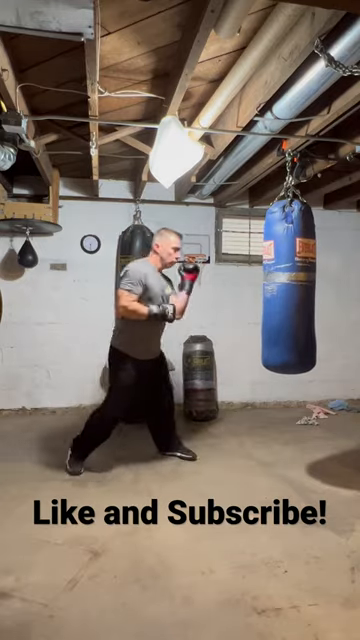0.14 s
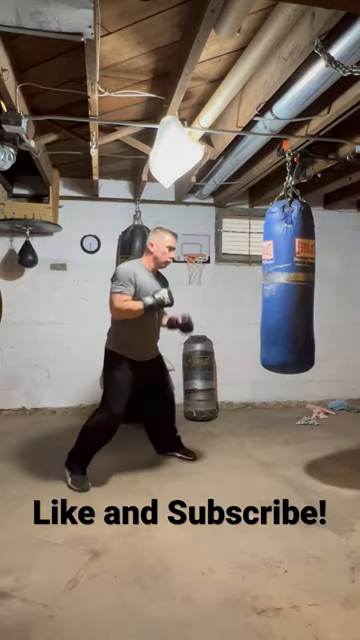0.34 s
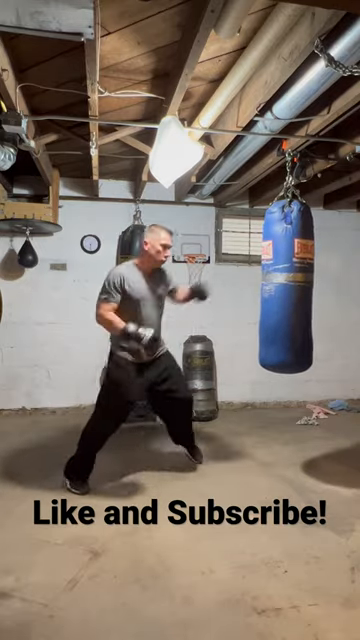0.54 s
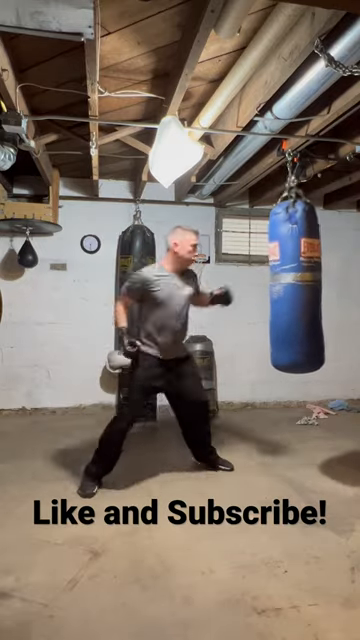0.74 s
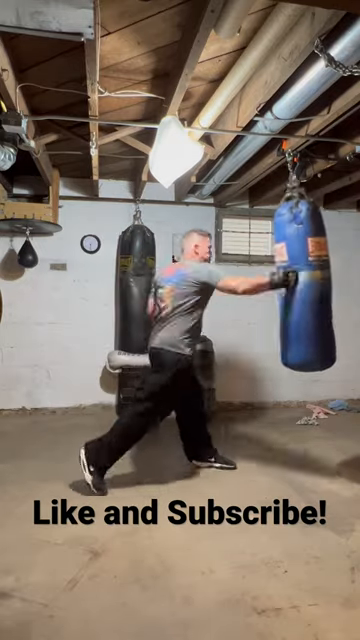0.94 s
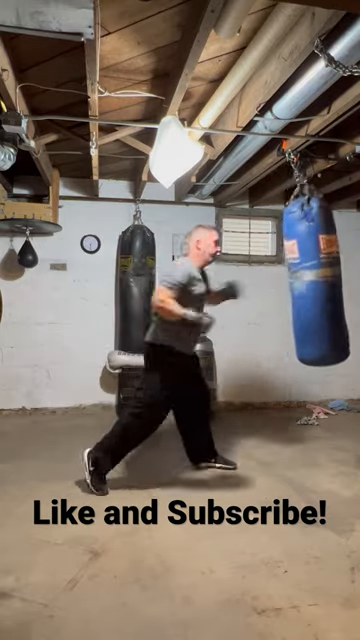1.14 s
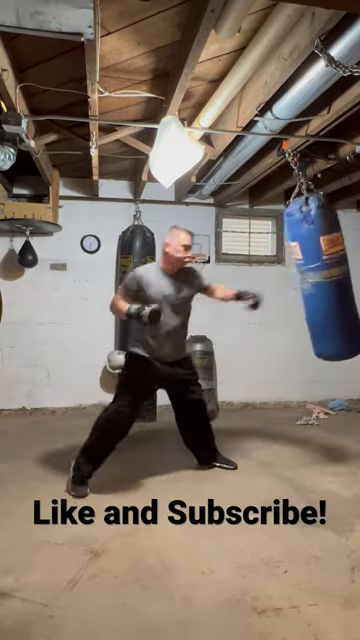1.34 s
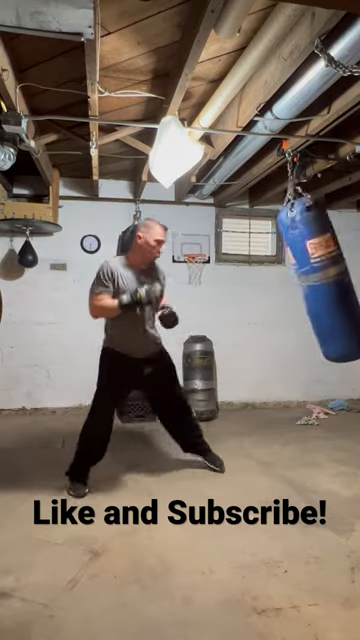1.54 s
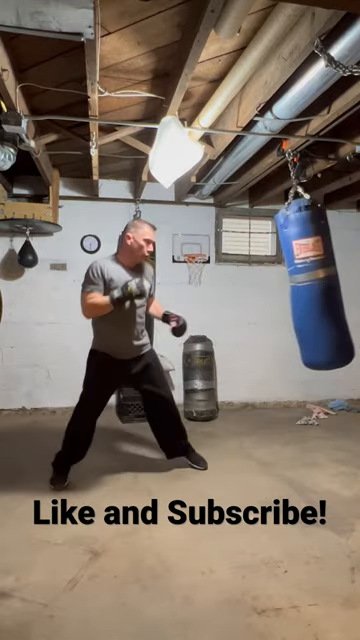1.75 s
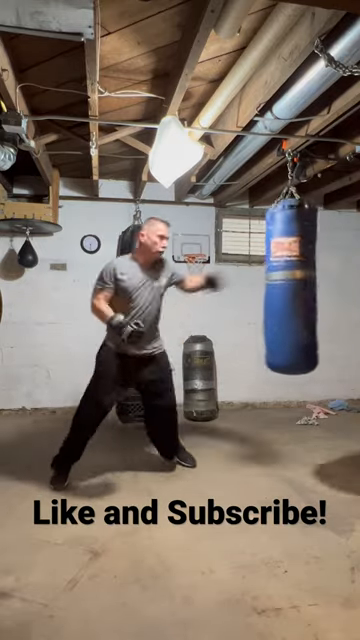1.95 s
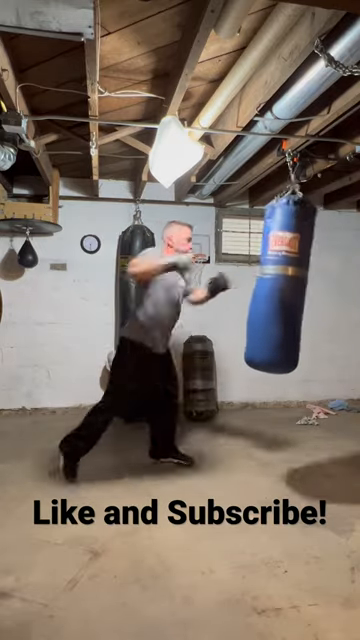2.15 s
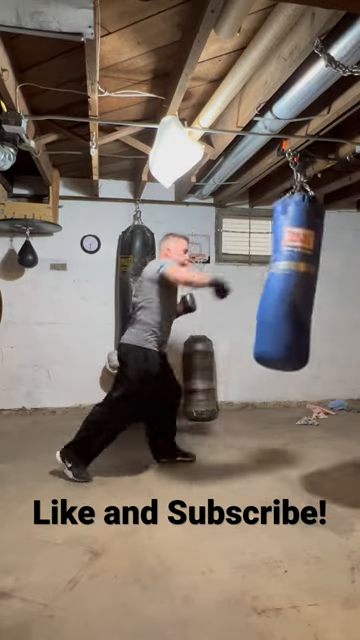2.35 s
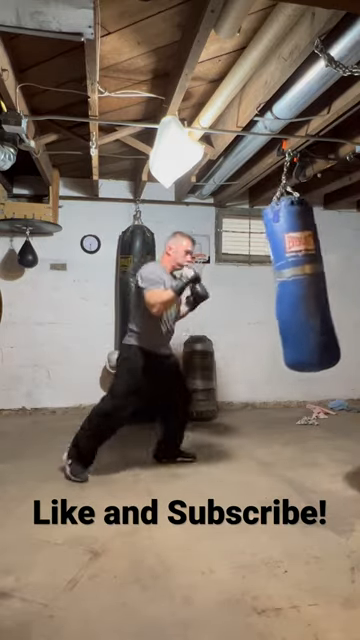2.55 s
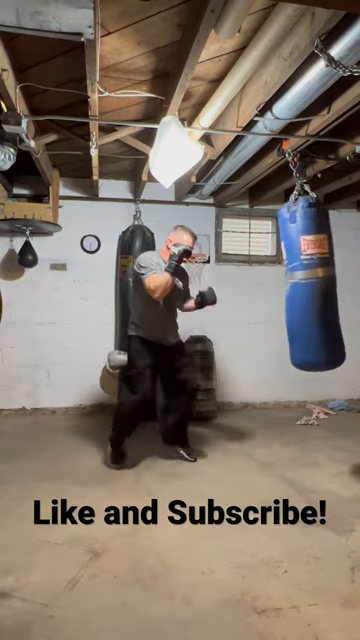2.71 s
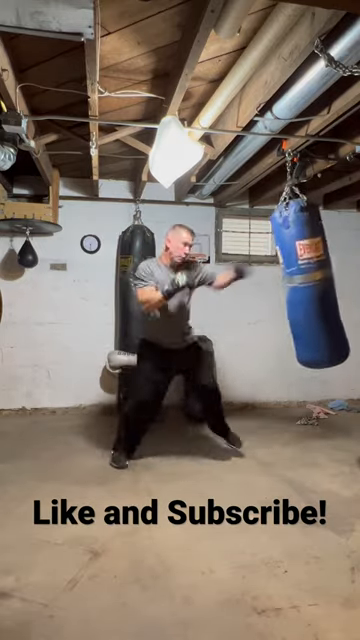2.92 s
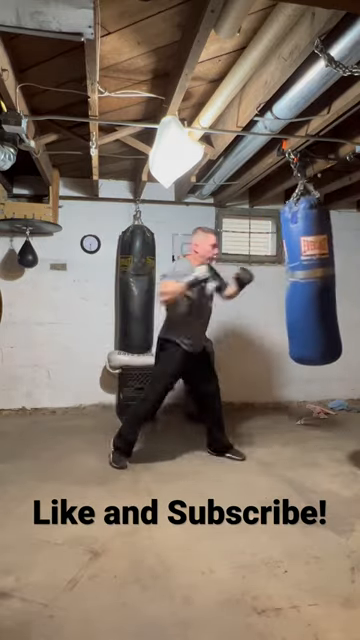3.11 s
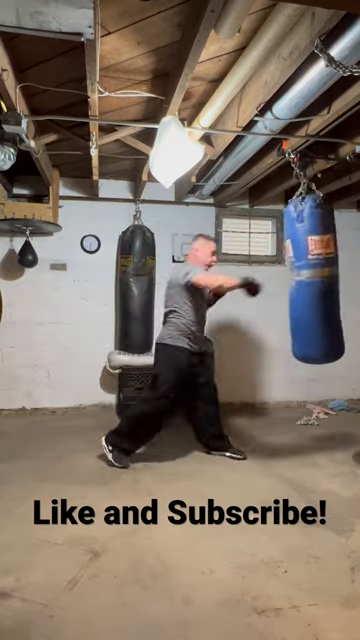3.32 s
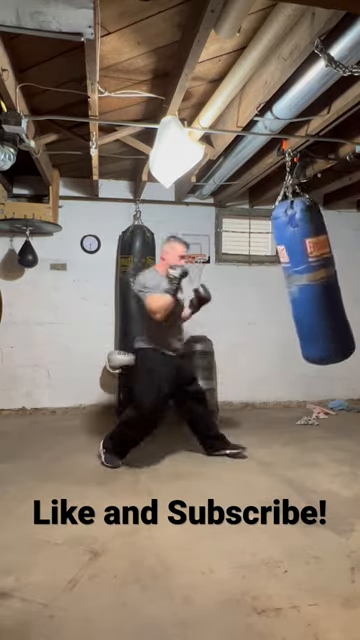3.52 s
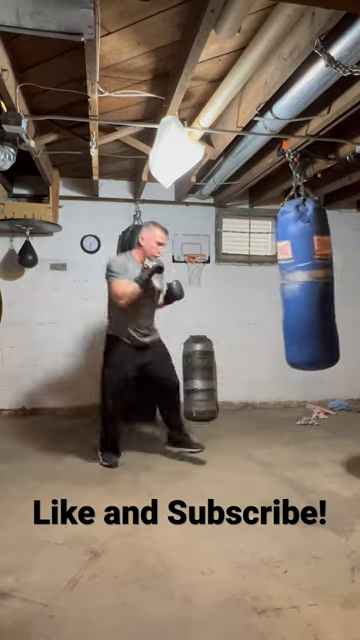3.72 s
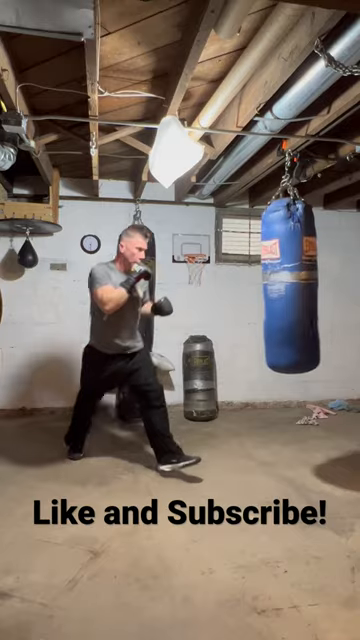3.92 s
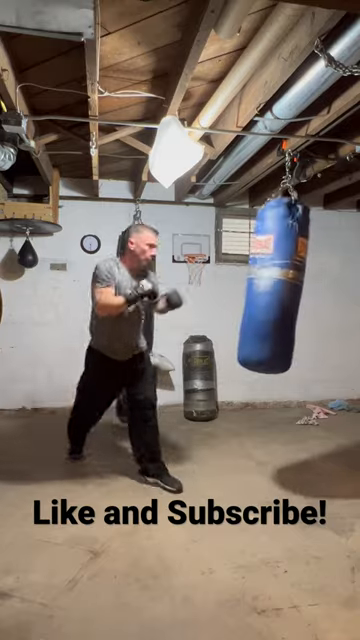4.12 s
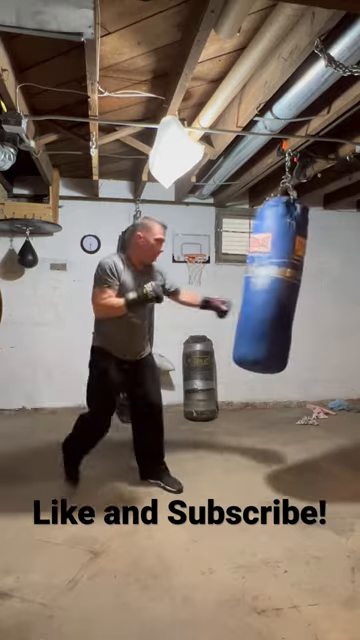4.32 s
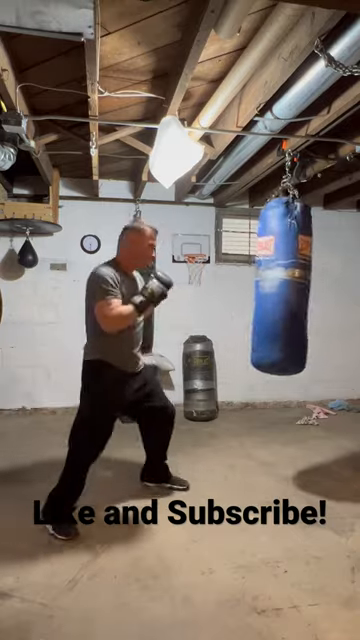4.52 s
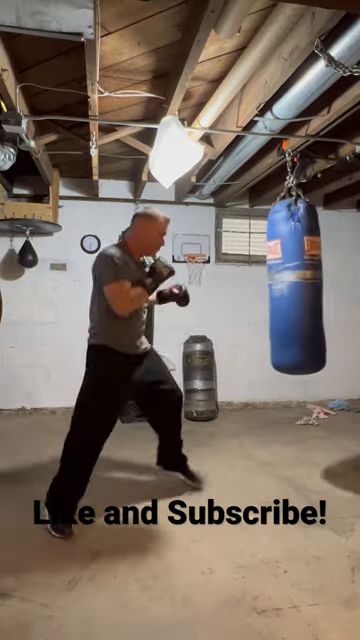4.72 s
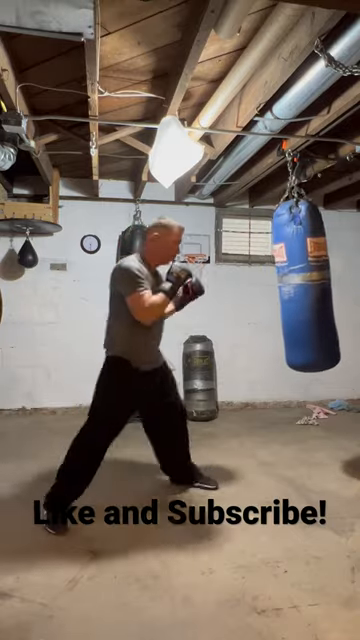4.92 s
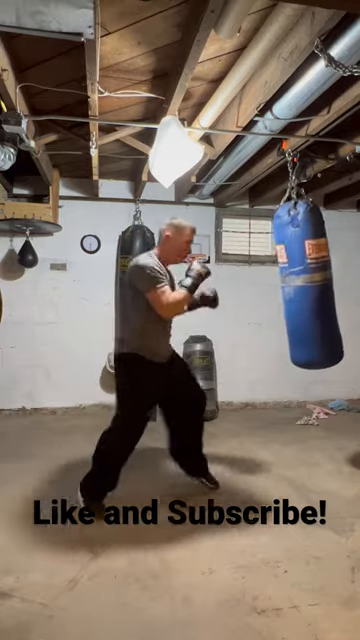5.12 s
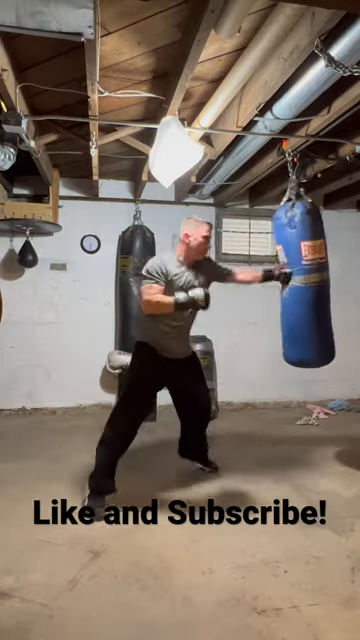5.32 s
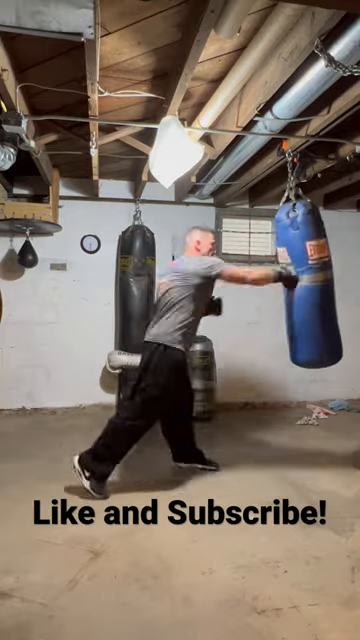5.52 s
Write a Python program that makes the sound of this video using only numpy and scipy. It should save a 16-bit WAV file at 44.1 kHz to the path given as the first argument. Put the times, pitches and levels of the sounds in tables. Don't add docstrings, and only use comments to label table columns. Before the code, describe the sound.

Ten sharp leather-on-bag punches in uneven groups boom through a small concrete basement, with footsteps, rubber squeaks and creaking timber between them.

```python
import sys
import numpy as np
from scipy import signal
from scipy.fft import rfft, irfft, next_fast_len
from scipy.io import wavfile
from scipy.ndimage import uniform_filter1d

SR = 44100
rng = np.random.default_rng(int(sys.argv[2]) if len(sys.argv) > 2 else 0)


def magnitude_from_level(level_db):
    exponent = np.asarray(level_db, float) / 20
    return 10 ** exponent


def waveform_to_disk(signal):
    frames = np.transpose(np.atleast_2d(signal))
    scaled = np.clip(frames, -1, 1) * 32767
    samples = np.round(scaled).astype(np.int16)
    wavfile.write(sys.argv[1], SR, samples)


N = 245195

# start in seconds, level of the thud in dB, of the slap in dB,
# of the joist boom in dB, weight of the thud in dB per octave downward.
BLOWS = [
    (0.57, -16, -20.5, -22.5, -0.5),
    (0.934, -5.5, -11.5, -17.5, 0),
    (1.217, -9.5, -14.5, -19, 1),
    (2.005, -13.5, -21.5, -19, 3.5),
    (2.23, -5, -13, -17, -0.5),
    (2.967, -11, -19.5, -22, 3),
    (3.209, -5.5, -15, -17.5, 1.5),
    (4.211, -14.5, -25.5, -29.5, 3.5),
    (5.302, -5.5, -17.5, -19.5, 0.5),
    (5.51, -6, -14.5, -15, -1),
]
# start in seconds, level in dB, pitch of the knock in Hz, low push in dB.
LANDINGS = [
    (0.343, -48.5, 426, 4),
    (1.158, -19, 204, -7),
    (1.751, -29, 160.6, -19),
    (2.735, -29, 402, 5.5),
    (4.12, -36.5, 188.7, -14),
    (4.447, -38, 188, -17),
    (4.766, -36, 352, -14),
    (4.8254, -29, 261, -31),
    (4.8859, -28.5, 418, -7),
    (5.073, -32, 721, -7),
]
# pitch in Hz, level in dB, time to fall by 60 dB in seconds.
TIMBER = [(31, -13, 0.4), (40.9, -24, 0.52), (54.3, -5.5, 0.68), (58.8, -5.5, 0.98), (68.53, 0.5, 0.53),
          (77.03, -1.5, 0.64), (90.1, 1, 0.25), (157.5, -3, 0.3), (231, -8.5, 0.24), (309, -14.5, 0.45),
          (437, -12.5, 0.27)]


def evened(x):
    return x / np.sqrt(np.mean(x ** 2) + 1e-20)


def read(points, hz):
    f, value = np.transpose(points)
    return np.interp(np.log(hz + 1), np.log(f + 1), value)


def add(mix, s, sound):
    part = mix[..., round(s * SR):][..., :sound.shape[-1]]
    part += sound[..., :part.shape[-1]]


def clock(length_s):
    return np.arange(round(length_s * SR) + 1) / SR


def colour(x, points):
    log_gain = np.log(magnitude_from_level(read(points, abs(np.fft.fftfreq(8192, 1 / SR)))))
    taps = np.fft.ifft(np.exp(np.conj(signal.hilbert(log_gain)))).real[:4096]
    taps = taps.reshape((1,) * (x.ndim - 1) + (-1,))
    return signal.oaconvolve(x, taps, axes=-1)[..., :x.shape[-1]]


def resonate(x, hz, width):
    turn = np.exp(2j * np.pi * np.cumsum(hz * np.ones(len(x))) / SR)
    r = np.exp(-np.pi * width / SR)
    return 2 * (turn * signal.lfilter([1 - r], [1, -r], x / turn)).real


def ring(modes, t, factor, phases):
    total = 0
    for (hz, db, t60), phase in zip(modes, phases):
        total = total + magnitude_from_level(db - 60 * t / t60) * np.sin(2 * np.pi * (hz * factor * t + phase))
    return total


def basement(sound, wet_db):
    # frequency in Hz, time to fall by 60 dB in seconds.
    tail_times = [(60, 0.98), (250, 0.48), (700, 0.51), (2000, 0.38), (5000, 0.44), (10000, 0.34),
                  (16000, 0.84)]
    # delay in seconds, level in dB.
    echoes = [(.0035, -14.5), (0.0143, -7.5), (0.0136, -9.5), (.021, -11.5), (0.028, -27)]
    size = SR // 2
    hz, t, z = signal.stft(rng.standard_normal((2, size)), SR, nperseg=256)
    z = z * magnitude_from_level(-60 * t / read(tail_times, hz)[:, None])
    tail = signal.istft(z, SR, nperseg=256)[1][:, :size]
    tail = tail * np.minimum(np.arange(size) / SR / 0.013, 1)
    taps = magnitude_from_level(wet_db) * tail / np.linalg.norm(tail[0])
    taps[:, 0] += (1, .4)
    for s, db in echoes:
        taps[[0, 1], (s * SR * rng.uniform(.9, 1.1, 2)).astype(int)] += magnitude_from_level(db)
    return signal.fftconvolve(sound[None], taps, axes=1)


def punch(thud_db, slap_db, boom_db, weight_db):
    # pitch in Hz, level in dB, time to fall by 60 dB in seconds.
    filling = [(112.6, 1, 0.032), (170.4, 0.5, 0.077), (231.7, 0, 0.06), (341, -6, 0.035), (423, 5, 0.022),
               (596, -7.5, 0.039), (717, -3, 0.023), (1116, -4, 0.011), (1470, 8, 0.0076),
               (1900, -40, 0.0054)]
    # frequency in Hz, gain in dB.
    leather = [(200, -25), (700, -7), (1500, -4), (3000, 7.5), (7000, -2), (12000, -16.5), (18000, -13)]
    t = clock(.12)
    factor = 1.0545 - 0.0345 * weight_db

    crackle = 0.07 * rng.standard_normal(len(t)) * np.exp(-t / 0.012)
    snap = 0.66 * rng.standard_normal(len(t))
    for level, hz in ((0.37, 3300), (1.16, 1700), (0.73, 7200)):
        snap += level * np.cos(2 * np.pi * hz * t)
    snap = 0.94 * snap * np.exp(-t / 0.00033) * (1 - np.exp(-t / .0001))
    slap = colour(snap + crackle, leather)

    modes = [(hz, db - weight_db * np.log2(hz / 350), t60) for hz, db, t60 in filling]
    phases = np.arange(len(filling)) / 2 + rng.uniform(0, 0.28, len(filling))
    turns = np.cumsum(factor * (140 + 700 * np.exp(-t / 0.005774))) / SR
    dent = 2.08 * np.sin(2 * np.pi * turns) * np.exp(-t / 0.008)
    rags = evened(resonate(rng.standard_normal(len(t)), 630, 820))
    packing = 0.34 * rags * np.exp(-t / 0.011)
    thud = (ring(modes, t, factor, phases) + dent + packing) * (1 - np.exp(-t / 0.00076))
    heard = basement(magnitude_from_level(slap_db + 13.5) * slap + magnitude_from_level(thud_db - 9.5) * thud, 2.12)

    t = clock(1.2)
    timber = [(hz * rng.uniform(1.0, 1.04), db, t60) for hz, db, t60 in TIMBER]
    boom = ring(timber, t, 0.97, rng.random(len(TIMBER)))
    boom = boom * (1 - np.exp(-(t / 0.0097) ** 2))
    out = np.zeros((2, len(t)))
    add(out, 0, heard)
    add(out[0], 0, magnitude_from_level(boom_db + 1.5) * boom)
    return out


def jingle(db, length):
    # pitch in Hz, level in dB, time to fall by 60 dB in seconds.
    steel = [(9810, 0, .03), (10200, -5, .02), (11300, -2, .025), (10800, -7, .015), (12200, -6, .02),
             (11700, -7, .015), (8900, -12, .012)]
    t = clock(length)
    hits = rng.random(len(t)) < 380 / SR
    clashes = hits * rng.standard_normal(len(t)) * np.exp(-1.5 * t / length)
    clashes[0] = 1
    modes = [(hz * rng.uniform(.995, 1.015), level + rng.normal(0, 3), t60) for hz, level, t60 in steel]
    rattle = signal.fftconvolve(clashes, ring(modes, clock(.05), 1, np.zeros(len(steel))))
    return basement(magnitude_from_level(db - 7.5) * rattle / np.std(rattle[:len(t)]), -1.3)


def scuff(db, rise, fall, bright_db, start):
    # frequency in Hz, gain in dB.
    rough = [(150, -17), (500, -7.5), (1100, -0.5), (1600, -2), (3600, 3), (7000, 0.5), (12000, -13.5),
             (18000, -26)]
    t = clock(rise + 5 * fall)
    grit = rng.standard_normal(len(t)) * magnitude_from_level(5.5 * rng.standard_normal(len(t)))
    shape = [(hz, g + bright_db * np.log2(hz / 3000)) for hz, g in rough]
    swell = (start + (1 - start) * t / rise) ** 2
    stroke = np.where(t < rise, swell, np.exp((rise - t) / fall))
    return basement(magnitude_from_level(db - 1.5) * evened(colour(grit, shape)) * stroke, 0.83)


def brush(db):
    return scuff(db, rise=0.0066, fall=.0025, bright_db=-2.5, start=0.74)


def strap(db, fall, bright_db):
    return scuff(db, rise=0.035, fall=fall, bright_db=bright_db, start=0.88)


def step(db, hz, low_db):
    t = clock(0.15)
    turns = np.cumsum(hz + 1800 * np.exp(-t / 0.001066)) / SR
    knock = np.sin(2 * np.pi * turns) * np.exp(-t / 0.0091)
    knock = knock + ring([(hz * 0.546, -2, .05), (75, low_db, .12)], t, 0.86, (0, 0))
    puff = resonate(resonate(rng.standard_normal(len(t)), 350, 410), 350, 410)
    puff = 2.8 * puff * np.exp(-t / 0.026)
    return basement(magnitude_from_level(db - 7.5) * (1.5 * knock + 1.1 * puff), .5)


def slide(db, rise, fall, start):
    return scuff(db, rise, fall, bright_db=-1.3, start=start)


def skid(db, fall):
    return scuff(db, rise=0.0014, fall=fall, bright_db=-1, start=0.53)


def squeak(db, hz, width, length):
    t = clock(length)
    pitch = hz * (1 + 0.0093 * np.sin(np.pi * t / length))
    whistle = resonate(resonate(rng.standard_normal(len(t)), pitch, width), pitch, width)
    shape = signal.windows.tukey(len(t), .12) * magnitude_from_level(-6 * t / length)
    return basement(magnitude_from_level(db + 1.5) * evened(whistle) * shape, -1.32)


def joists():
    timber = ring(TIMBER, clock(.5), 0.98, np.zeros(len(TIMBER)))
    return evened(signal.fftconvolve(rng.standard_normal(N), timber)[:N])


def sway(blows, blow_db, landing_db, build, loss_db, rest_db):
    jolts = [(s, db + blow_db) for s, db in blows] + [(s, db + landing_db) for s, db, *_ in LANDINGS]
    s, db = np.transpose(jolts)
    times = np.arange(0, N / SR + .01, .002)
    t = np.maximum(times[:, None] - s, 0)
    motion = magnitude_from_level(db - loss_db * t) * (1 - np.exp(-(t / build) ** 2))
    power = magnitude_from_level(2 * rest_db) + (motion ** 2).sum(1)
    return np.interp(np.arange(N) / SR, times, np.sqrt(power))


def swaying():
    # start in seconds, level
    # in dB.
    shakes = [
        (.34, -57),
        (.68, -28),
        (1.501, -27),
        (2.76, -24),
        (3.501, -25),
        (5.1, -53),
    ]
    # level against the blow in dB, against the
    # landing in dB, time to build in seconds, loss in dB per second, level at rest in dB.
    groan_motion = (-9, -20, 0.23, 31, -72)
    shiver_motion = (-21.5, -10, 0.41, 45.5, -67.5)
    # frequency in Hz, gain in dB.
    rustle_tone = [(120, -3.5), (300, 2), (700, -2), (1500, -12), (3500, -12.5), (8000, -17.5),
                   (12000, -25), (18000, -53)]
    groan = sway([(s, boom_db) for s, _, _, boom_db, _ in BLOWS] + shakes, *groan_motion)
    shiver = sway([(s, thud_db) for s, thud_db, *_ in BLOWS], *shiver_motion)
    flicker_db = 1.3 * evened(uniform_filter1d(rng.standard_normal(N), 700))
    rustle = evened(colour(rng.standard_normal((2, N)), rustle_tone))
    rustle = rustle * shiver * magnitude_from_level(flicker_db - 2)
    return rustle + [[1], [0]] * groan * joists()


def room_tone():
    # frequency in Hz, gain in dB.
    air = [(18, -33), (30, 3), (199, 1), (449, -7), (600, -15), (1070, 6), (4910, -15), (7670, -8),
           (12000, -22), (13000, -33), (16000, -42)]
    return magnitude_from_level(-69) * evened(colour(rng.standard_normal((2, N)), air))


def ports(near, apart):
    # frequency in Hz, share of the difference that follows the sum (0 to 1).
    following = [(100, .7), (500, .3), (5000, .35), (9000, .65), (13000, .85)]
    # frequency in Hz, level of the difference against the sum in dB.
    wide = [(30, -52), (80, -47), (170, -34.5), (350, -13), (900, -4.5), (2000, -9), (3000, -5.5),
            (5200, -1), (6500, -13.5), (8000, -3), (11000, 1), (15600, 19.5), (16200, -27)]
    size = next_fast_len(N + 4096)
    hz = np.fft.rfftfreq(size, 1 / SR)
    same = np.clip(read(following, hz), 0, 1)
    side = same * (0.017 + 1j) * rfft(near, size) + np.sqrt(1 - same ** 2) * rfft(apart, size)
    side = irfft(magnitude_from_level(read(wide, hz)) * side, size)[:N]
    return np.array([near + side, near - side])


def scene():
    # start in seconds, level in dB, length in seconds.
    jingles = [(0.619, -44, 0.06), (0.709, -50, .03), (1.162, -34, 0.064), (1.314, -39.5, 0.098),
               (1.428, -46.5, 0.086), (2.036, -46, 0.1), (2.31, -36, 0.11), (2.672, -53.5, 0.042),
               (3.017, -35, 0.038), (3.153, -38.5, 0.015), (3.285, -42, 0.13), (3.705, -48, 0.027),
               (5.364, -50, 0.063)]
    # start in seconds, level in dB.
    brushes = [
        (0.924, -34),
        (1.978, -44),
        (2.219, -36),
        (2.957, -40.5),
        (5.291, -44),
    ]
    # start in seconds, level in dB, fall in seconds, brightness in dB per octave.
    straps = [
        (.701, -57.5, 0.27, 8),
        (1.31, -39, 0.066, -1.1),
        (2.077, -42, 0.094, 3),
        (2.309, -42.5, 0.11, 0.5),
        (3.028, -45, 0.1, -4.5),
        (3.131, -43.5, 0.03, 21.5),
        (5.369, -36.5, 0.19, 2.5),
    ]
    # start in seconds, level in dB, rise in seconds, fall in seconds,
    # share present from the first moment (0 to 1).
    slides = [
        (0.119, -61, 0.025, 0.021, .1),
        (.263, -36.5, 0.058, 0.0071, 0.48),
        (0.519, -46.5, 0.053, 0.039, 0.28),
        (.838, -43, 0.041, 0.033, 0.66),
        (1.601, -46, 0.061, 0.04, 0.2),
        (2.631, -79.5, 0.028, .13, 0.6),
        (3.7, -48.5, 0.056, 0.022, .5),
        (4.011, -47, 0.029, 0.067, 0.54),
        (4.415, -29, 0.054, 0.0058, 0),
        (4.82, -53.5, .04, 0.061, .5),
    ]
    # start in seconds, level in dB, fall in seconds.
    skids = [
        (0, -53, 0.052),
        (1.155, -40, 0.12),
        (1.75, -51, 0.046),
        (2.737, -32.5, 0.006),
        (3.623, -42, 0.0024),
        (4.689, -45.5, 0.04),
        (3.842, -40, 0.035),
        (4.766, -35.5, .0062),
        (4.939, -49, .05),
        (5.074, -32.5, 0.023),
    ]
    # start in seconds, level in dB, pitch in Hz, width in Hz, length in seconds.
    squeaks = [
        (0.286, -43.5, 3680, 910, 0.065),
        (0.51, -90, 2430, 121.2, 0.014),
        (2.732, -41, 4590, 300, 0.092),
        (2.739, -38, 4370, 420, .03),
        (3.846, -52, 1180, 200, 0.013),
        (3.85, -53.5, 3850, 300, 0.047),
        (4.454, -31, 3630, 1130, 0.037),
        (5.396, -33.5, 3960, 320, 0.083),
    ]
    # frequency in
    # Hz, gain in dB.
    phone = [(20, -7), (50, -0.5), (95, 1.5), (120, 4), (158, 2), (195, 2), (240, 3), (1500, 2.5),
             (3800, 2), (5100, -1.5), (6200, 3.5), (10000, 5.5), (12000, 4.5), (17000, -18)]
    field = swaying()
    for source, rows in ((punch, BLOWS), (jingle, jingles), (brush, brushes), (strap, straps),
                         (step, LANDINGS), (slide, slides), (skid, skids), (squeak, squeaks)):
        for s, *row in rows:
            add(field, s, source(*row))
    near, apart = colour(field, phone) + room_tone()
    return ports(near, apart)


def thinned(side):
    # low edge in Hz, high edge in Hz, share of the time left out (0 to 1).
    holes = [(1750, 2250, .35), (3500, 4100, .12), (5600, 6200, .3), (6200, 6900, .6), (6900, 7500, .3),
             (9300, 9700, .15), (13500, 15800, .08)]
    hz, t, z = signal.stft(side, SR, nperseg=1024)
    luck = uniform_filter1d(rng.standard_normal((len(holes), len(t))), size=5)
    for (low_hz, high_hz, share), row in zip(holes, luck):
        z[(hz > low_hz) & (hz <= high_hz)] *= row > np.quantile(row, share)
    return signal.istft(z, SR, nperseg=1024)[1][:N]


def gated(mid):
    hz, t, z = signal.stft(mid, SR, nperseg=512)
    upper, top = (hz > 11670) & (hz <= 12400), hz > 12400
    upper_db = 10 * np.log10((abs(z[upper]) ** 2).sum(0) + 1e-12)
    top_db = 10 * np.log10((abs(z[top]) ** 2).sum(0) + 1e-12)
    jump_db = top_db - np.roll(top_db, 2)
    attack = 1 / (1 + magnitude_from_level(4.0 * (10 - jump_db)))
    strong = 1 / (1 + magnitude_from_level(2.4 * (-53 - upper_db)))
    z[upper] *= np.maximum(attack, strong)
    z[top] *= attack
    return signal.istft(z, SR, nperseg=512)[1][:N]


def band_limit(x):
    return signal.sosfilt(signal.butter(12, 16810, fs=SR, output="sos"), x)


def record(dry):
    mid = gated((dry[0] + dry[1]) / 2)
    side = thinned((dry[0] - dry[1]) / 2)
    rounded = np.tanh(np.array([mid + side, mid - side]) / 1.2) * 1.25
    return band_limit(rounded)


dry = scene()
out = record(dry)
waveform_to_disk(out)
```